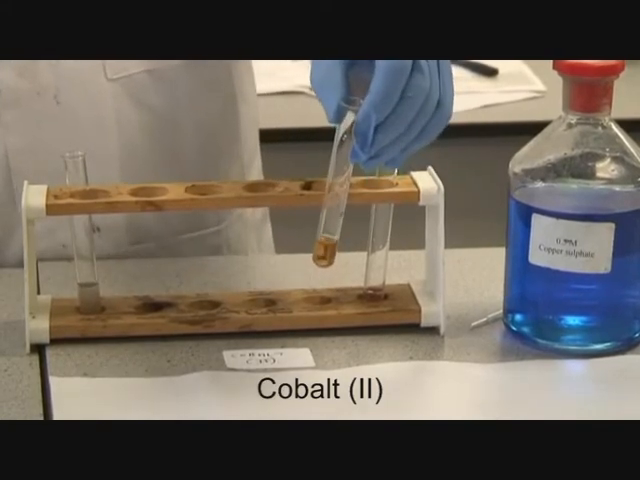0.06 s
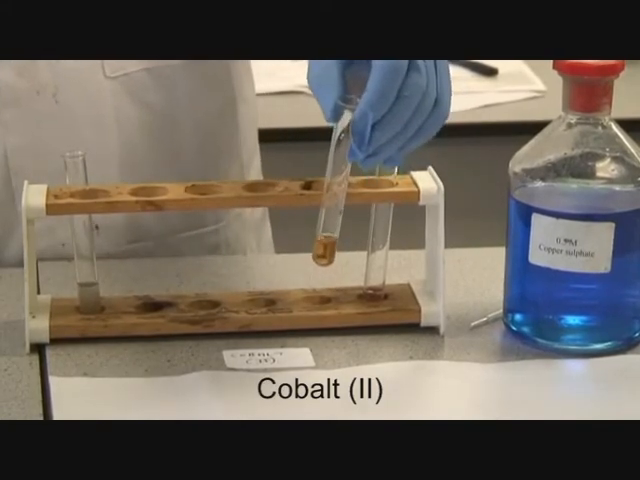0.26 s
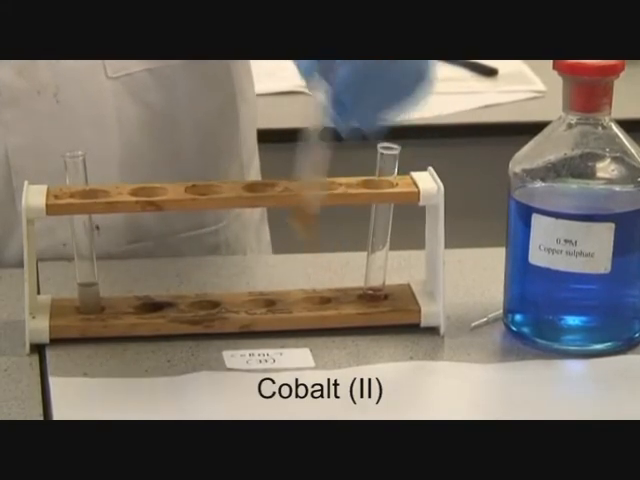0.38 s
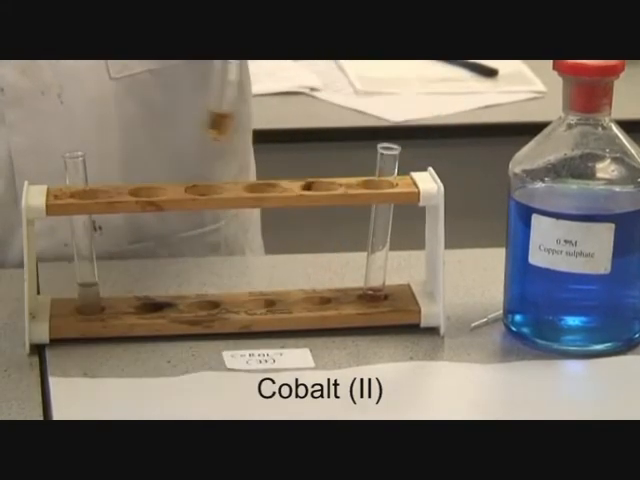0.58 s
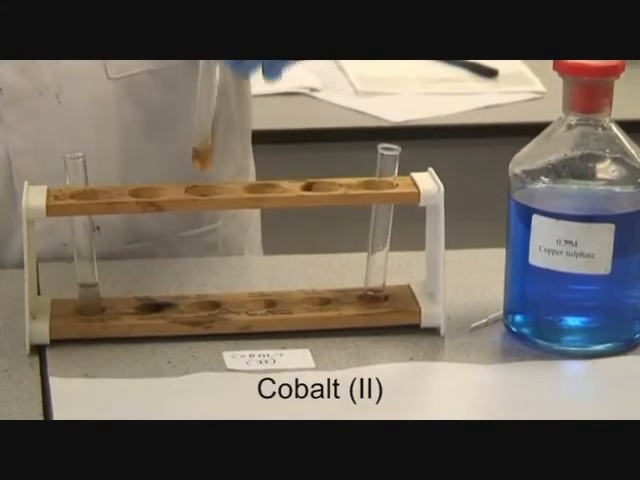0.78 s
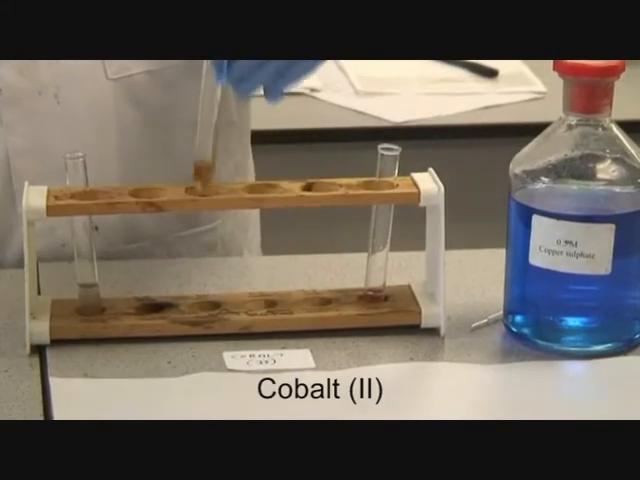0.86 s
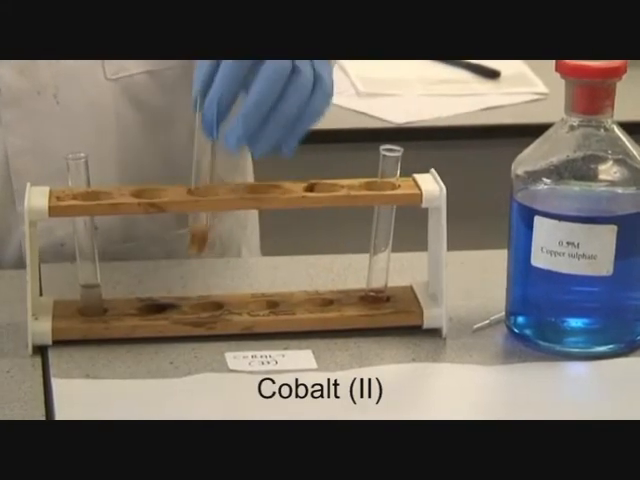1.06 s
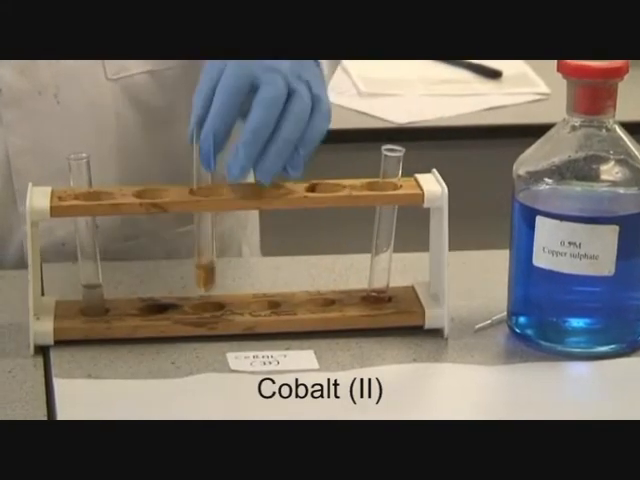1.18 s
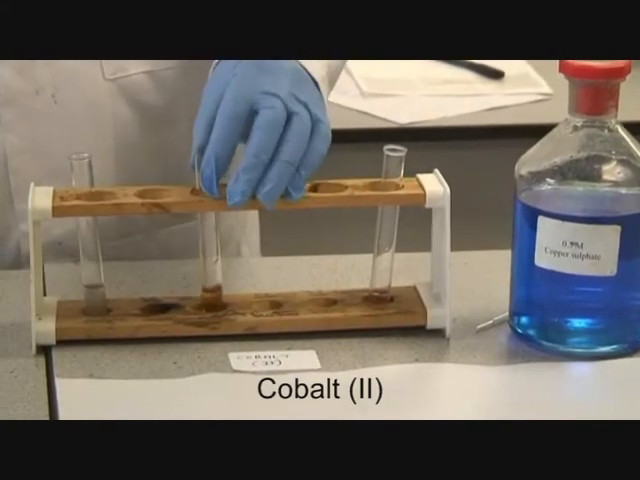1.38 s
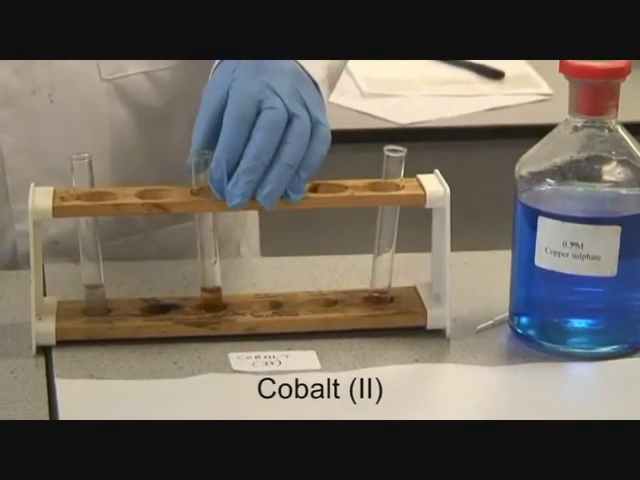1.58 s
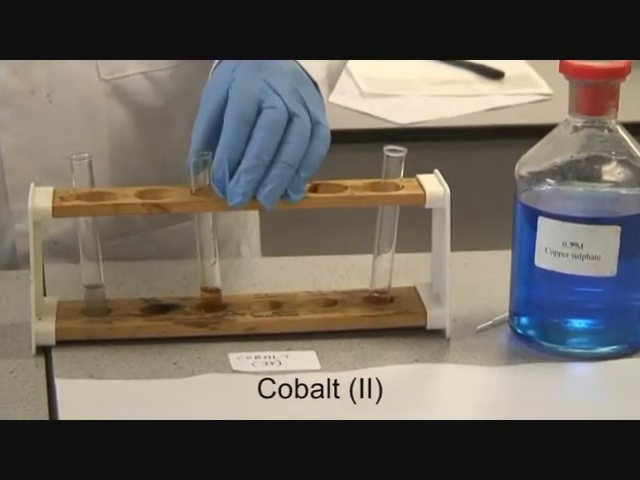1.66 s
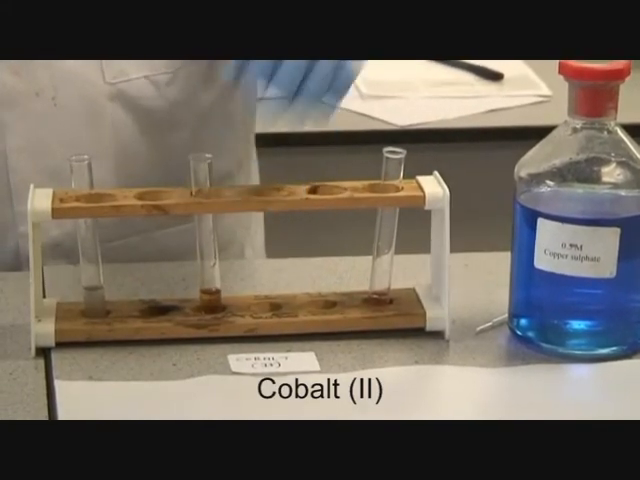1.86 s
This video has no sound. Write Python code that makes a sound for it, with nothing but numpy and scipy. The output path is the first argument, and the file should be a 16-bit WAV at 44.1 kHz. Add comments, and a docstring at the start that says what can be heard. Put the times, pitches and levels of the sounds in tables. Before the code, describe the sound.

A glass test tube clinks and knocks against a wooden rack, then is set down softly.

```python
"""Test tube in a wooden rack

A small laboratory, the rack straight in front of a stereo microphone, near enough to hear glass rub.
The tube is drawn out: it brushes the hole, clinks, and knocks hard against the top bar.
Later it is set down softly in another hole and tips against the rim as the hand lets go.
The room answers each knock, over ventilation, a faint hum and microphone hiss."""
import sys
import numpy as np
from scipy import signal
from scipy.fft import rfft, irfft
from scipy.io import wavfile

SR = 44100
rng = np.random.default_rng(int(sys.argv[2]) if len(sys.argv) > 2 else 0)


def waveform_to_disk(signal):
    """Save audio, clipped to [-1, 1], as 16-bit WAV at the path in sys.argv[1]."""
    frames = np.transpose(np.atleast_2d(signal))
    scaled = np.clip(frames, -1, 1) * 32767
    samples = np.round(scaled).astype(np.int16)
    wavfile.write(sys.argv[1], SR, samples)


N = 83790
T = np.arange(N) / SR
HZ = np.fft.rfftfreq(2 * N, 1 / SR)


def amp(db):
    """Decibels to gain."""
    return 10 ** (np.asarray(db) / 20)


def unit(x):
    """Scales to rms 1."""
    return x / np.sqrt(np.mean(x ** 2) + 1e-20)


def curve(points, hz=HZ):
    """Interpolates a table on a log-frequency axis."""
    f, value = np.transpose(points)
    return np.interp(np.log(hz + 1), np.log(f + 1), value)


def colour(x, gain):
    """Minimum-phase filter with the given gain at each of HZ."""
    cepstrum = irfft(np.log(np.maximum(gain, 1e-5)))
    cepstrum[1:N] *= 2
    cepstrum[N + 1:] = 0
    return irfft(rfft(x, 2 * N) * np.exp(rfft(cepstrum)))[..., :N]


def add(mix, start, sound):
    """Mixes a sound in, start seconds from the beginning."""
    part = mix[max(round(start * SR), 0):][:len(sound)]
    part += sound[:len(part)]


def noise(gain):
    """Steady noise of rms 1, shaped by a gain at each of HZ."""
    return unit(irfft(rfft(rng.standard_normal(2 * N)) * gain)[:N])


def impulses(per_s):
    """Impulses of random size at random times."""
    return rng.standard_normal(N) * (rng.random(N) < per_s / SR)


def friction(tone_db):
    """Fine friction grains of a given colour."""
    return unit(colour(impulses(per_s=4000), amp(tone_db)))


def ring(modes):
    """Half a second of a struck body's decaying modes, alternating in sign."""
    t = T[:SR // 2]
    return sum((-1) ** k * amp(db - 60 * t / t60) * np.sin(2 * np.pi * hz * t)
               for k, (hz, db, t60) in enumerate(modes))


def strike(body, blows, bass_hz=530, radiation_hz=240, contact_order=2.87):
    """Blows on a small body: soft contact dulls it, a heavy one adds bass; deep bass hardly radiates."""
    radiation = HZ ** 2 / np.hypot(HZ ** 2, radiation_hz ** 2)
    out = np.zeros(N)
    for start, db, cutoff_hz, bass_db in blows:
        weight = amp(db + bass_db / (1 + (HZ / bass_hz) ** 2))
        softness = np.sqrt(1 + (HZ / cutoff_hz) ** (2 * contact_order))
        add(out, start, colour(body, weight / softness * radiation))
    return out


# air and hiss spectra, the stereo mid and side: f/Hz, relative level/dB
AIR_MID = [(20, -12.5), (40, -22), (80, -16.5), (125, -12.5), (200, -11), (300, -9), (380, -12.5),
           (550, -18.5), (1100, -22), (2000, -28.5), (4000, -31.5), (8000, -33), (15000, -33)]
AIR_SIDE = [(20, -5), (60, -3.5), (155, -5), (256, -10), (1200, -21), (3550, -17), (15000, -18)]
def ventilation():
    """Steady moving air and microphone hiss, a little different left and right."""
    mid = amp(-59.5) * noise(amp(curve(AIR_MID)))
    side = amp(-68.5) * noise(amp(curve(AIR_SIDE)))
    return np.array([mid + side, mid - side])


# mains harmonics: f/Hz, rms level/dB
HUM_PARTIALS = [(150, -62), (200, -72.5), (300, -72.5)]
def mains_hum(waver_depth=0.19, waver_hz=6):
    """Faint mains hum in the centre, each harmonic wavering in level."""
    out = np.zeros(N)
    for hz, db in HUM_PARTIALS:
        waver = 1 + waver_depth * noise(np.exp(-HZ / waver_hz))
        out += np.sqrt(2) * amp(db) * waver * np.sin(2 * np.pi * (hz * T + rng.random()))
    return out


# decay of the laboratory: f/Hz, t60/s
ROOM_DECAY = [(200, 0.44), (500, 0.4954), (1000, 0.37), (2000, 0.32), (4500, 0.4), (10000, 0.67)]
# colour of its reflections: f/Hz, relative level/dB
ROOM_COLOUR = [(150, -10), (350, 2), (560, -1.5), (820, -5), (975, 6.5), (1150, -0.5), (2100, -5),
               (2900, 0), (4500, -0.5), (10000, -12)]
def laboratory(sound, delay_s=0.0051, build_s=0.0095):
    """Diffuse reflections reach the microphone after the direct sound, build, and die band by band."""
    hz, t, bands = signal.stft(impulses(per_s=4000), SR, nperseg=256)
    decay = amp(-60 * t / curve(ROOM_DECAY, hz)[:, None])
    tail = signal.istft(bands * decay, SR, nperseg=256)[1][:N]
    tail *= np.clip((T - delay_s) / build_s, 0, 1)
    tail = colour(tail / np.linalg.norm(tail), amp(curve(ROOM_COLOUR)))
    return amp(-2) * signal.fftconvolve(sound, tail)[:N]


# rubs on the way out: middle t/s, half length t/s, level/dB, resonance f/Hz
RUBS = [(0.051, 0.049, -62.5, 1120), (0.108, 0.024, -63.5, 630), (0.195, 0.036, -51, 697)]
# spectrum of glass on wood: f/Hz, relative level/dB
RUB_COLOUR = [(200, -12), (450, -4), (900, -4), (1200, -3.5), (1600, -7), (3000, -15.5), (4100, -9),
              (5200, -28), (6200, -16), (8000, -30), (14000, -30)]
def sliding(resonance_db=13.5, width_hz=150):
    """Glass brushes the hole in soft swells, each with a pitch of its own."""
    out = np.zeros(N)
    for middle, half_length, db, hz in RUBS:
        peak_db = resonance_db / (1 + ((HZ - hz) / width_hz) ** 2)
        swell = np.exp(-((T - middle) / half_length) ** 2)
        out += amp(db) * swell * friction(curve(RUB_COLOUR) + peak_db)
    return out


# spectrum of glass on the edge of the hole: f/Hz, relative level/dB
RASP_COLOUR = [(1000, -40), (2800, -31), (3700, 2), (4300, -6), (5400, -6.5), (6200, -4), (7400, -24),
               (9900, -14.5), (13000, -34)]
def rasp(start_s=0.173, rise_s=0.0052):
    """One bright burst of friction as the tube catches the edge."""
    age = np.maximum(T - start_s, 0) / rise_s
    return amp(-52.5) * age * np.exp(1 - age) * friction(curve(RASP_COLOUR))


# base board modes: f/Hz, relative level/dB, t60/s
BASE_MODES = [(499, 0.5, 0.047), (670, 0.5, 0.022), (854, -3.5, 0.042)]
# landings on the base: t/s, relative level/dB, contact cutoff f/Hz, bass level/dB
LANDINGS = [(1.4778, -46.5, 1110, -9), (1.4863, -46.5, 583, 1)]
def touchdown():
    """The round end of the tube lands softly on the base board."""
    return strike(ring(BASE_MODES), LANDINGS)


# modes of the standing tube and its seat: f/Hz, relative level/dB, t60/s
SEAT_MODES = [(512.5, -4, 0.093), (648, -0.5, 0.056), (804, -7.5, 0.12), (870, -4, 0.044),
              (1061, 0.5, 0.085), (1298, -6, 0.064), (1538, -5, 0.051), (2000, -10, 0.062),
              (2110, -7, 0.037), (4030, -5.5, 0.032)]
# tips against the rim: t/s, relative level/dB, contact cutoff f/Hz, bass level/dB
TIPS = [(1.704, -43, 3000, -5), (1.7121, -41.5, 2300, 1.5), (1.7317, -47.5, 1810, -9),
        (1.7795, -48.5, 1620, 3)]
def settling():
    """The released tube rocks in its hole."""
    return amp(-6.5) * strike(ring(SEAT_MODES), TIPS)


# modes rung at the rim: f/Hz, relative level/dB, t60/s
RIM_MODES = [(444, -6.5, 0.049), (682, -1.5, 0.08), (960, -0.5, 0.019), (1400, -3, 0.017)]
# slips along it: t/s, relative level/dB, contact cutoff f/Hz, bass level/dB
RIM_SLIPS = [(0.0952, -43, 1290, -3.5), (0.1678, -39, 600, 2.5), (0.1752, -38, 1030, 3),
             (0.2083, -35, 990, -18), (0.2113, -26.5, 1240, -12), (0.2143, -38, 1200, -27)]
def stutter():
    """The rising tube stutters along the rim of the hole."""
    return strike(ring(RIM_MODES), RIM_SLIPS)


# glass tube modes: f/Hz, relative level/dB, t60/s
GLASS_MODES = [(3894, -7, 0.073), (4230, -16, 0.049), (4370, 0.5, 0.034), (5000, -10, 0.12),
               (6134, -3, 0.037), (6570, -11, 0.027), (6620, -8.5, 0.022), (9850, -15, 0.09)]
# taps on the glass: t/s, relative level/dB
GLASS_TAPS = [(0.1655, -50.5), (0.1756, -40), (0.1813, -48), (0.19, -65), (0.2241, -46.5)]
def clinks():
    """Light, sharp contacts ring the glass."""
    out, glass = np.zeros(N), ring(GLASS_MODES)
    for start, db in GLASS_TAPS:
        add(out, start, amp(db) * glass)
    return amp(-7.5) * out


# rack modes: f/Hz, relative level/dB, t60/s
RACK_MODES = [(361, -14.5, 0.12), (483, -3.5, 0.092), (648, -1.5, 0.044), (800.6, -11.5, 0.14),
              (901.2, 0.5, 0.1), (986.6, -3.5, 0.17), (1059, -2.5, 0.059), (1363, 4, 0.075),
              (1582, 1, 0.031), (1725, 0, 0.028), (2050, -4.5, 0.06), (2211, -5, 0.025),
              (2480, -7.5, 0.063), (2990, -19, .05)]
# dense, quickly damped vibration of the wood: f/Hz, relative level/dB
WOOD_COLOUR = [(100, -23.5), (250, -23), (450, 5.5), (1000, -12.5), (1900, -0.5), (2500, -2), (3000, -9),
               (4500, -13), (7000, -22), (12000, -25)]
# tube against rack: t/s, relative level/dB, contact cutoff f/Hz, bass level/dB
RACK_BLOWS = [(0.094, -30.5, 840, 6), (0.1672, -21.5, 476, 9), (0.2212, -2.5, 2380, 0),
              (0.2238, -5, 2500, 0.5), (0.2288, -14.5, 3170, -8), (0.231, -9.5, 3000, -4)]
def knocks(crack_db=2.5, crack_t60_s=0.024):
    """Each knock rings the rack's modes along with its own short woody crack."""
    wood = unit(colour(rng.standard_normal(N), amp(curve(WOOD_COLOUR))))
    out, rack = np.zeros(N), ring(RACK_MODES)
    fade = amp(crack_db - 60 * T[:len(rack)] / crack_t60_s)
    for blow in RACK_BLOWS:
        crack = np.roll(wood, rng.integers(N))[:len(rack)] * fade
        out += strike(rack + crack, [blow])
    return amp(-21) * out


def tube_and_rack():
    """All that tube and rack send in one direction; the fine grain differs for each direction."""
    lifting = knocks() + stutter() + clinks() + rasp() + sliding()
    return lifting + touchdown() + settling()


def scene():
    """The rack is on the microphone's axis; the room returns what it sends elsewhere."""
    direct = tube_and_rack()
    reflected = laboratory(tube_and_rack())
    return direct + reflected + ventilation() + mains_hum()


def record(dry):
    """The recorder behind the microphone cuts the highest treble."""
    lowpass = signal.firwin(401, cutoff=15350, window=("kaiser", 8), fs=SR)
    return signal.oaconvolve(dry, lowpass[None], "same")


dry = scene()
out = record(dry)
waveform_to_disk(out)
```